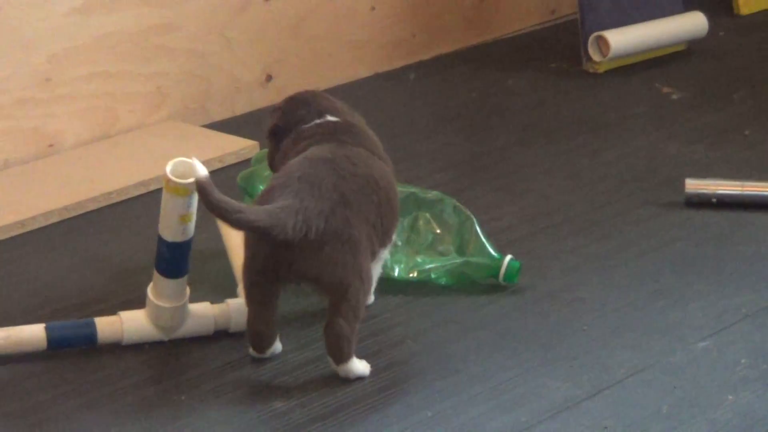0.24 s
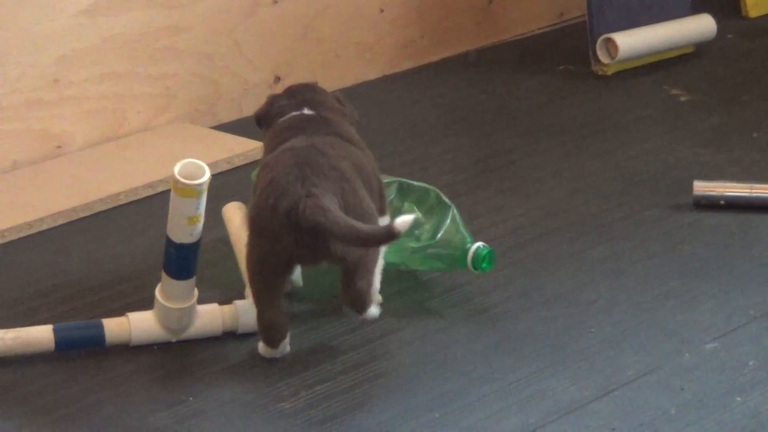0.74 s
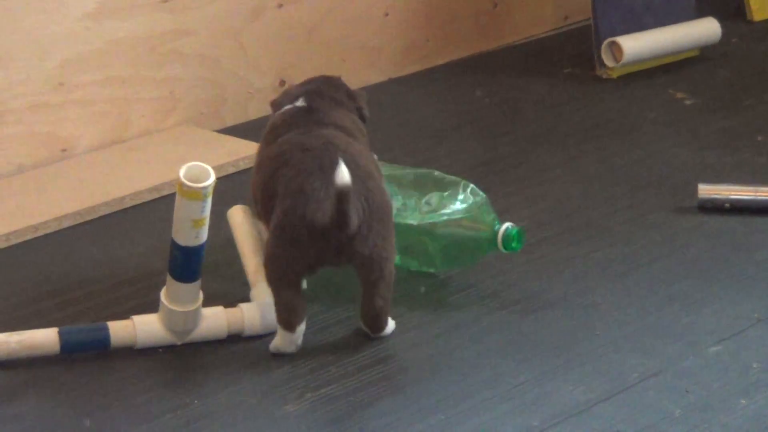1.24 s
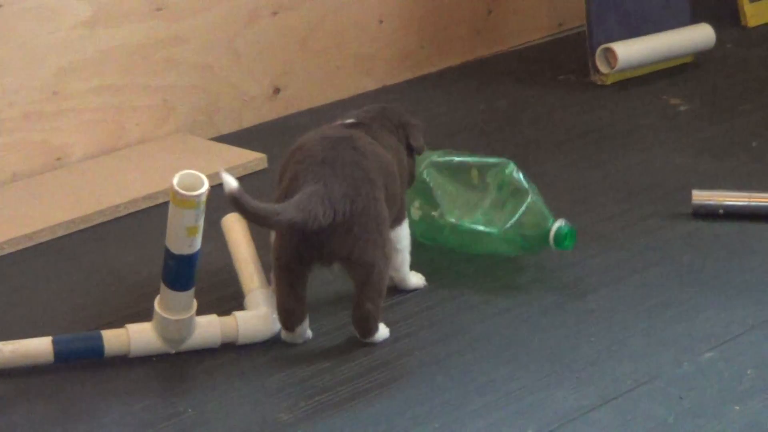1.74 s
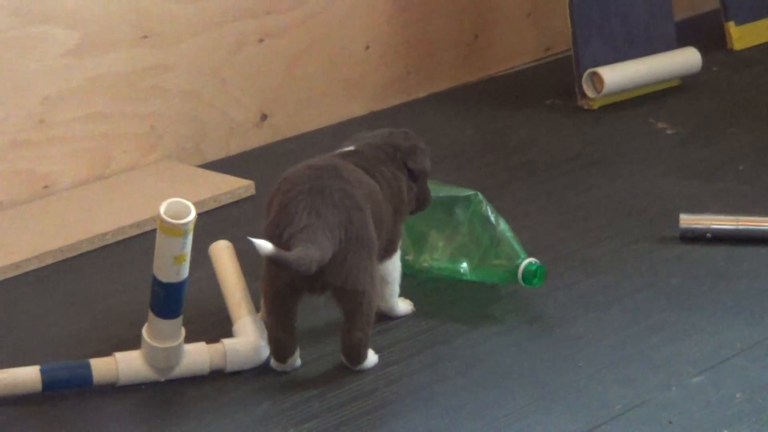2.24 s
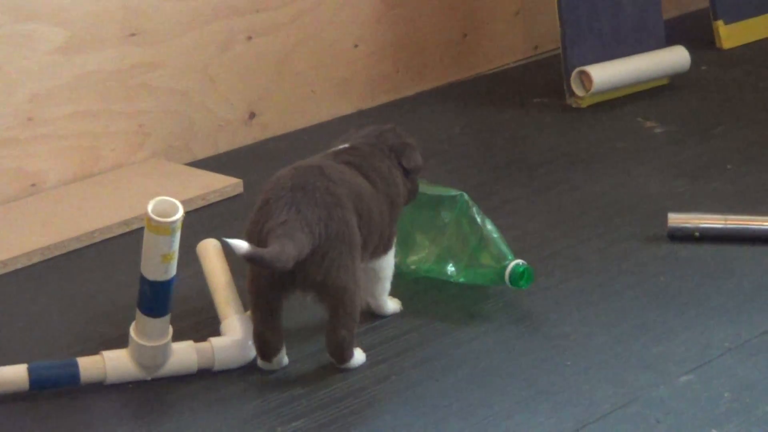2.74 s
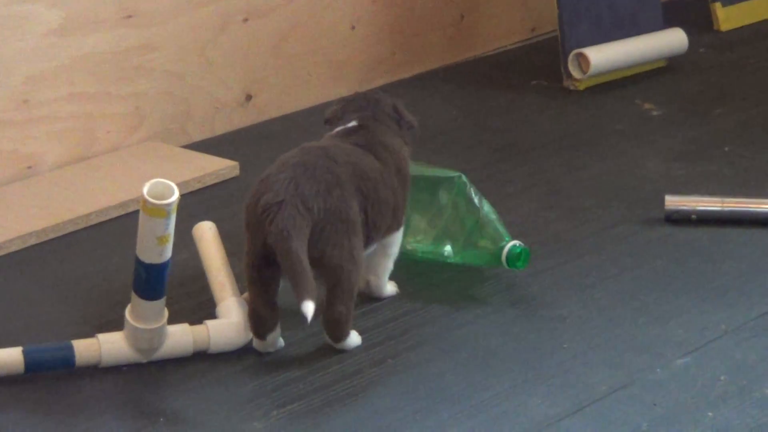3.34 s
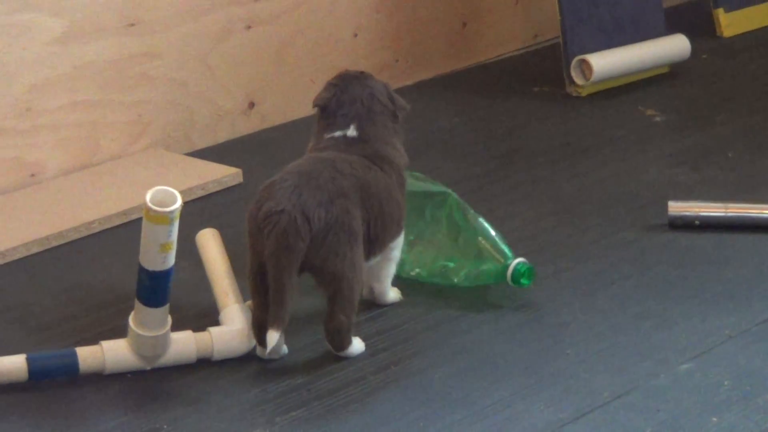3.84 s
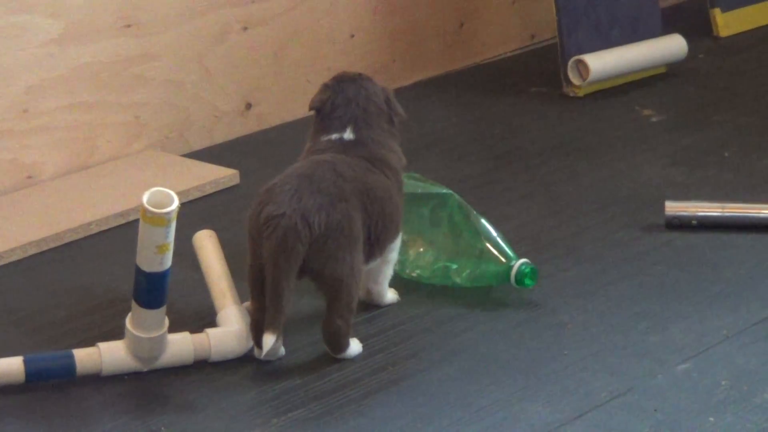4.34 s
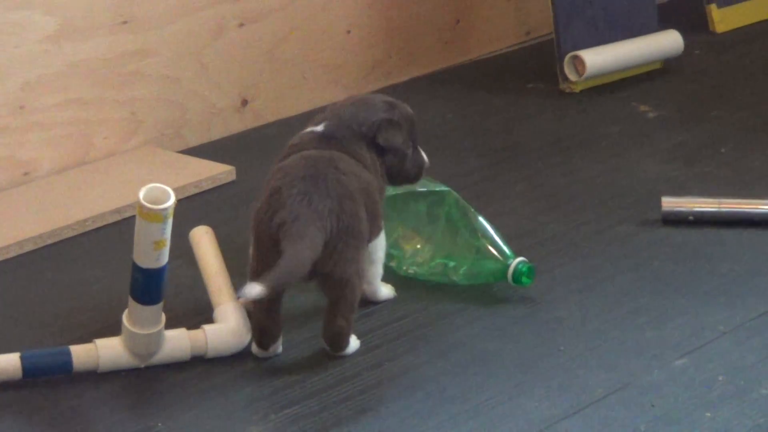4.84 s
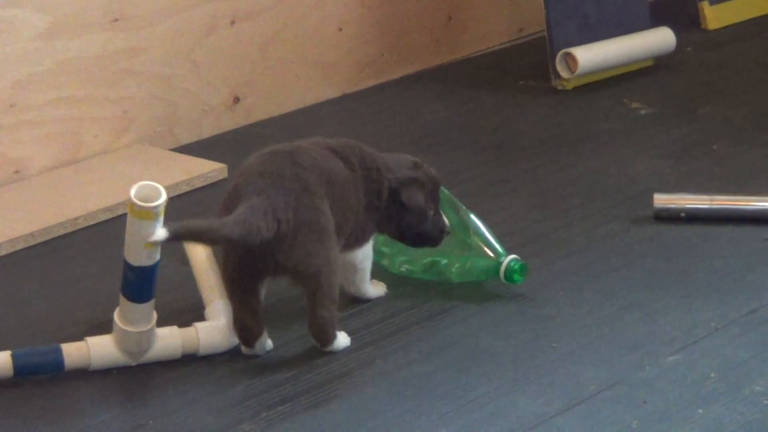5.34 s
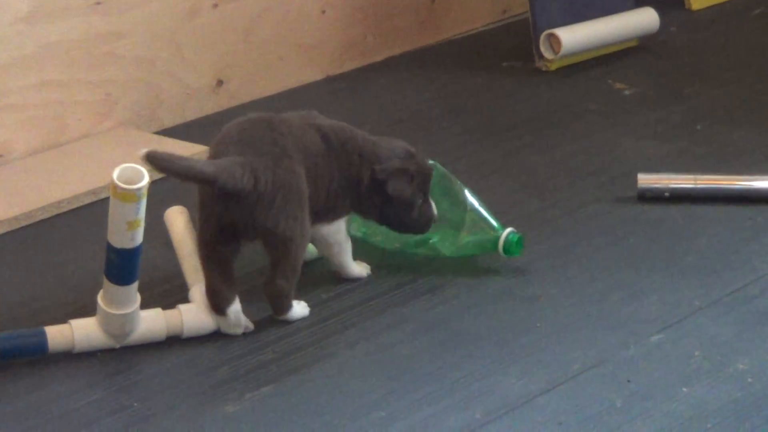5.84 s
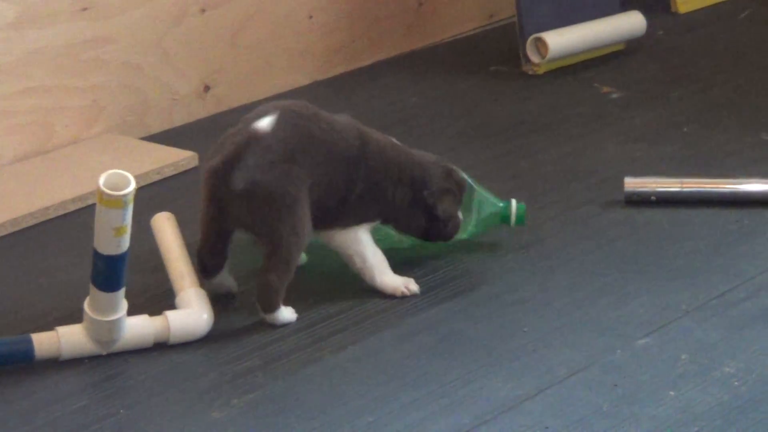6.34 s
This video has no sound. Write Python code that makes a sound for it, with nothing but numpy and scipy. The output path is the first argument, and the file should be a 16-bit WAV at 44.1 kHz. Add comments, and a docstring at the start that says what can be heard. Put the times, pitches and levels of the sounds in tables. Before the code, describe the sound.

Nearly continuous puppy whimpers and squeals, each a short cry rising then sagging, from near and farther animals. Underneath, padded feet scrape rubber, claws snap on plastic and an empty bottle gives low, dull thumps. Floor scuffing peaks after five seconds; the ending is sparser, with softer whines and a quick rasping creak. Low fan hum, soft room rush and a barely audible very high whistle. Two-channel pickup from one side, short room reflections.

```python
"""Puppies whine and squeal in a plywood pen: gliding partials, with noise for the hoarse breath.
Paws scuff the rubber floor (shaped noise) and knock a plastic bottle (ringing modes); claws tick on plastic.
Near the end comes a short run of creaks. A fan hums low in the room rush; a thin tone whistles at the top.
A two-port microphone takes the pen from one side, the left port leading in phase; the walls answer."""
import sys
import numpy as np
from scipy import signal
from scipy.fft import rfft, irfft, next_fast_len
from scipy.io import wavfile
from scipy.ndimage import uniform_filter1d, map_coordinates

SR = 44100
rng = np.random.default_rng(int(sys.argv[2]) if len(sys.argv) > 2 else 0)


def transcribe(u):
    """Save the signal u as a 16-bit wav file named by the first command-line argument.

    u: samples, shape (n,) or (channels, n), limited to [-1, 1]; the rate is SR.
    q: integer samples, one column per channel.
    """
    v = np.clip(np.atleast_2d(u).T, -1, 1)
    q = np.round(v * 32767).astype(np.int16)
    wavfile.write(sys.argv[1], SR, q)


N = 291501  # samples


def amp(db):
    """Decibels to amplitude."""
    return 10 ** (np.asarray(db) / 20)


def unit(x):
    """x scaled to an rms of one."""
    return x / np.sqrt(np.mean(x ** 2) + 1e-20)


def along(points, hz):
    """Read (freq_hz, value) points at hz, straight lines on a log frequency axis."""
    f, v = np.transpose(points)
    return np.interp(np.log(hz + 1), np.log(f + 1), v)


def wobble(rate, size=N):
    """A smooth random curve with rate knots a second."""
    knots = rng.standard_normal(int(size * rate / SR) + 4)
    return map_coordinates(knots, [np.arange(size) * rate / SR])


def filtered(x, response):
    """Multiply the spectrum of x by a response of frequency."""
    m = next_fast_len(x.shape[-1] + 8192)
    spectrum = rfft(x, m) * response(np.fft.rfftfreq(m, 1 / SR))
    return irfft(spectrum, m)[..., :x.shape[-1]]


def add(track, s, sound):
    """Mix a sound into the track from time s."""
    part = track[round(s * SR):][:len(sound)]
    part += sound[:len(part)]


# spectral shape of the room rush: freq_hz, level_db (relative)
RUSH_SHAPE = [(12, -55), (20, -24), (80, -1.5), (170, -0.5), (416, -11), (490, -7.5), (690, -16.5),
              (1010, -19), (1340, -19), (2150, -22.5), (3640, -27), (6000, -29), (8200, -23.5),
              (10500, -29.5), (13900, -36), (15500, -33)]
# likeness of the rush at the two ports: freq_hz, likeness (0-1)
RUSH_LIKENESS = [(60, 1), (180, 0.66), (550, 0.58), (1650, 0.075), (4970, 0.46), (15000, 1)]
# steady low lines of the fan: freq_hz, level_db (mean of the wavering peak level)
FAN_LINES = [(118.4, -44), (150.7, -42), (188.4, -47.5), (215.3, -49)]
RUSH_DB = -43.5  # mean level, rms
WHISTLE_HZ, WHISTLE_DB = 15734, -57.5  # mean level, rms


def air():
    """Room rush, partly alike at the two ports, with the fan's fuzzy low lines and the thin whistle."""
    def spread(f):
        turn = np.arccos(np.clip(along(RUSH_LIKENESS, f), 0, 1)) / 2
        return amp(along(RUSH_SHAPE, f)) * np.array([np.cos(turn), np.sin(turn)])

    mid, side = filtered(rng.standard_normal((2, N)), spread)
    rush = amp(RUSH_DB + 0.53 * wobble(3.04)) * unit(np.array([mid + side, mid - side]))
    t = np.arange(N) / SR
    fan = np.zeros(N)
    for hz, db in FAN_LINES:
        fan += amp(db + 2.5 * wobble(12)) * np.sin(2 * np.pi * hz * t + 1.5 * wobble(16))
    whistle_level = amp(WHISTLE_DB + 1.5 * wobble(40))
    whistle = whistle_level * np.sin(2 * np.pi * WHISTLE_HZ * t + .3 * wobble(20))
    return rush + fan + np.sqrt(2) * whistle


ONSET_DB, FADE_DB = 7, 8.5  # a whine starts and ends this far under its hold, before smoothing
GLIDE_BEND = .72  # share of a glide's pitch step done in the half away from the hold
ARCH, SAG_DB = .018, 3  # mid-hold the pitch arches up by this share, and the fundamental thins


def contour(row):
    """One whine's controls at its corners and halfway between: time, pitch and three levels."""
    start, glide_in, hold, glide_out, first, held, drifted, last, *levels = row
    first_db, late_db, octave_db, bright_db, late_bright_db = levels
    halves = np.abs([0, glide_in, glide_in, hold, hold, glide_out, glide_out]) / 2
    s = start + np.cumsum(halves)
    hz = [first, first + GLIDE_BEND * (held - first), held, (1 + ARCH) * (held + drifted) / 2,
          drifted, last + GLIDE_BEND * (drifted - last), last]

    def shape(a, b, sag_db):
        return [a - ONSET_DB, a, a, (a + b) / 2 - sag_db, b, b - FADE_DB / 2, b - FADE_DB]

    fundamental = shape(first_db, late_db, SAG_DB)
    octave = shape(octave_db, octave_db, 0)
    return s, hz, fundamental, octave, shape(bright_db, late_bright_db, 0)


# how the throat weights partials 3 to 12: freq_hz, level_db (relative)
THROAT = [(2500, -21.5), (3600, -18.5), (4500, 1), (5200, 1), (5900, -7.5), (7700, 1), (9200, -5.5),
          (10300, -22.5), (14000, -38)]
# spectral shape of the low hiss around the fundamental: freq_hz, level_db (relative)
HUSK_SHAPE = [(350, -30.5), (650, 0.5), (1100, -2), (1800, -4.5), (2300, -30.5)]
# spectral shape of the breath in the bright part: freq_hz, level_db (relative)
BREATH_SHAPE = [(300, -32), (800, -2.5), (1800, -0.5), (3000, -17.5), (4800, 1.5), (6000, -6), (7800, 9.5),
                (9800, -6), (12000, -47)]
MOUTH_HZ, MOUTH_WIDTH_HZ, MOUTH_DB = 1575, 297, 4  # the mouth lifts the low partials that cross it
HUSK_DB = -9  # against the fundamental's set level, at a hoarseness of 1


def call(corners, rough):
    """One whine: partials on a gliding pitch; hoarse folds waver, flutter and leak hiss."""
    s, *controls = corners
    t = np.arange(s[0], s[-1], 1 / SR)
    n = len(t)
    hz, first_db, octave_db, bright_db = [
        uniform_filter1d(np.interp(t, s, c), size=800, mode="nearest") for c in controls]
    waver = rough * (.04 * wobble(30, size=n) + .026 * wobble(150, size=n))
    hz = hz * (1 + .005 * wobble(14, size=n) + waver)
    phase = 2 * np.pi * np.cumsum(hz) / SR

    def flutter():
        return amp(2.3 * wobble(30, size=n)) * (1 + .7 * rough * wobble(200, size=n))

    def mouth(f):
        return MOUTH_DB / (1 + ((f - MOUTH_HZ) / MOUTH_WIDTH_HZ) ** 2)

    k = np.arange(3, 13)[:, None]  # overtone numbers
    upper = amp(along(THROAT, k * hz) + rng.normal(0, 1.5, k.shape))
    upper /= np.sqrt(np.sum(upper ** 2, axis=0))
    # each overtone's level drifts at random, apart from the others
    drift = amp([2.4 * wobble(18, size=n) for _ in k])
    tones = np.sin(k * phase + 2 * np.pi * rng.random(k.shape))
    overtones = np.sum(upper * drift * tones, axis=0)

    fundamental = amp(first_db + mouth(hz)) * flutter() * np.sin(phase)
    octave = amp(octave_db + mouth(2 * hz)) * flutter() * np.sin(2 * phase + 1)
    husk = unit(filtered(rng.standard_normal(n), lambda f: amp(along(HUSK_SHAPE, f))))
    low = fundamental + octave + rough * amp(first_db + HUSK_DB) * husk
    breath = unit(filtered(rng.standard_normal(n), lambda f: amp(along(BREATH_SHAPE, f))))
    bright = amp(bright_db) * (1.3 * flutter() * overtones + (.2 + .65 * rough) * breath)
    edge = np.clip(np.minimum(t - s[0], s[-1] - t) / .008, 0, 1)  # 8 ms ramps
    return edge * (np.sqrt(2) * low + bright)


# every whine glides in, holds while it drifts, and glides out; pitch and levels before waver and flutter:
# puppy, voice, start_s, glide_in_s, hold_s, glide_out_s, first_hz, held_hz, drifted_hz, last_hz,
# fundamental_db at hold start, fundamental_db at hold end, octave_db,
# bright_db at hold start, bright_db at hold end
WHINES = [ ("far", "hoarse", .088, .004, .006, .02, 805, 793, 815, 980, -41, -43, -67, -60, -60),
          ("near", "husky", .155, .07, .08, .075, 930, 1075, 1170, 1270, -38, -31.5, -52.5, -40.5, -52),
          ("far", "husky", .51, .01, 0.021, 0.021, 314, 320, 328, 326, -40, -42, -38, -60, -70),
          ("near", "clear", .709, .012, .026, 0.016, 1680, 1614, 1340, 1090, -25, -24.5, -62, -44, -36.5),
          ("near", "clear", .983, .014, 0.16, .04, 1680, 1560, 1460, 1044, -27, -19.5, -53.5, -36.5, -29.5),
          ("far", "hoarse", 1.15, 0.019, .005, 0.014, 823, 850, 854, 1000, -34, -36, -44, -55, -60),
          ("near", "clear", 1.345, .064, .27, .036, 893, 1175, 1085, 1070, -30, -33.5, -40, -26.5, -33),
          ("far", "rough", 1.36, 0.053, 0.035, .016, 1068, 1310, 1290, 1320, -35, -35, -58, -60, -60),
          ("second", "rough", 1.62, .056, .05, 0.025, 670, 973, 960, 740, -32, -25.5, -48, -53, -38),
          ("near", "husky", 1.72, .075, .075, 0.048, 1245, 1760, 1760, 1000, -27.5, -27.5, -55, -40, -41),
          ("near", "rough", 1.92, .056, .074, 0.05, 556, 906, 818, 722, -24.5, -32.5, -49, -48.5, -43.5),
          ("far", "rough", 1.985, .03, .01, 0.029, 1600, 1660, 1640, 1000, -40.5, -42, -69, -60, -60),
          ("near", "husky", 2.1, .064, .064, .04, 975, 1262, 1066, 770, -40, -36, -45.5, -34, -30.5),
          ("far", "hoarse", 2.11, 0.027, .04, .012, 1410, 1437, 1530, 1560, -46, -43, -66, -57, -60),
          ("second", "hoarse", 2.15, 0.0346, 0.104, 0.017, 620, 810, 790, 710, -24, -24.5, -38.5, -64, -62),
          ("near", "husky", 2.25, .015, 0.031, .015, 800, 775, 780, 700, -27, -29, -30.5, -30, -31),
          ("near", "husky", 2.3, .04, 0.0594, 0.023, 850, 950, 1005, 1020, -29.5, -35, -46, -33, -38),
          ("second", "hoarse", 2.31, 0.019, 0.044, 0.041, 722, 685, 705, 670, -30, -38.5, -51, -72, -68),
          ("second", "hoarse", 2.5, .044, .03, 0.0406, 900, 949, 930, 910, -45, -37, -44, -46, -43),
          ("second", "hoarse", 2.6, 0.0303, .07, 0.051, 700, 830, 720, 586, -30, -32.5, -44.5, -54, -70),
          ("near", "clear", 2.6, .02, .13, 0.032, 1300, 1195, 1110, 980, -34.5, -43, -50, -39, -31.5),
          ("far", "hoarse", 2.3, .016, .04, .014, 2000, 1593, 1700, 1354, -44, -45, -72, -55, -60),
          ("near", "clear", 2.945, .035, .095, .075, 1163, 1285, 1225, 808, -38, -40, -55, -41.5, -36),
          ("second", "hoarse", 2.95, .04, .16, 0.057, 700, 800, 680, 640, -36.5, -30.5, -51, -73, -70),
          ("near", "clear", 3.16, .1, .34, .08, 980, 1270, 1255, 880, -31, -24, -54.5, -32.5, -30),
          ("second", "hoarse", 3.39, .014, 0.0445, .052, 660, 685, 678, 578, -23.5, -32.5, -36, -55, -58),
          ("far", "rough", 3.48, .034, .136, 0.025, 1157, 990, 756, 1100, -42, -40, -46, -44, -50),
          ("second", "hoarse", 3.66, 0.051, .03, 0.0687, 620, 890, 800, 700, -28.5, -26.5, -46, -45, -47),
          ("near", "rough", 3.87, .05, .29, .07, 760, 850, 840, 760, -37.5, -29, -34.5, -37, -34.5),
          ("second", "hoarse", 3.945, .05, .02, .055, 950, 1170, 1090, 860, -30.5, -29, -51, -32.5, -41),
          ("second", "clear", 4.25, .04, .025, .025, 1080, 1370, 1350, 1290, -19, -17, -44, -36, -31),
          ("near", "rough", 4.26, 0.029, 0.0905, .06, 780, 760, 757, 751, -37, -32, -35, -30, -37),
          ("second", "rough", 4.32, .02, .05, .05, 1320, 1250, 990, 800, -32.5, -33, -29, -28, -32),
          ("near", "rough", 4.44, .036, 0.055, 0.034, 755, 781, 885, 960, -31.5, -33, -47, -58, -46),
          ("near", "rough", 4.555, .065, .115, .06, 900, 1170, 1000, 637, -27, -28, -25.5, -24.5, -27.5),
          ("second", "husky", 4.61, 0.017, .054, 0.019, 1272, 1199, 1235, 1227, -21.5, -35, -40.5, -31, -27),
          ("near", "rough", 4.94, .06, .11, .03, 700, 975, 925, 690, -31, -32.5, -42, -43.5, -35),
          ("near", "rough", 5.3, .052, .07, .078, 556, 975, 900, 620, -30, -31, -41, -36, -35.5),
          ("near", "husky", 5.63, .06, .11, .025, 1260, 1210, 1080, 720, -37, -43.5, -51, -46.5, -49.5),
          ("second", "hoarse", 5.64, 0.0098, .06, .06, 665, 680, 650, 552, -29.5, -38, -53, -60, -50),
          ("far", "husky", 5.915, 0.023, .006, 0.021, 256, 321, 320, 293, -38.5, -46, -39, -65, -68),
          ("near", "rough", 6.03, .17, .13, .06, 1110, 920, 925, 670, -44, -39, -42.5, -49, -45),
          ("far", "clear", 6.05, .03, .008, .022, 1523, 1607, 1605, 1640, -40, -44, -71, -58, -54),
          ("far", "husky", 6.32, .06, 0.0384, .03, 308, 392, 323, 208, -37, -43, -40, -55, -70),
          ("near", "husky", 6.562, 0.016, 0.028, 0.0055, 1046, 1022, 1055, 1100, -44, -39, -53.5, -57, -50),
          ]
# hoarseness of each kind of voice: voice, hoarseness (0-1)
HOARSENESS = {"clear": .12, "husky": .3, "rough": .45, "hoarse": .62}


def puppy(name):
    """All the whines of one puppy, each with the hoarseness of its voice."""
    out = np.zeros(N)
    for who, voice, *row in WHINES:
        if who == name:
            add(out, row[0], call(contour(row), HOARSENESS[voice]))
    return out


# paw scuffs on the floor: start_s, level_db, length_s (of the rounded fall), dullness_db per octave
SCUFFS = [(.156, -34, 0.045, -7.5), (0.279, -34, .05, -6), (.436, -29.5, 0.073, -3),
          (.63, -36.5, 0.062, -5), (0.9, -36, 0.046, -6.5), (1.3137, -27, 0.11, -1),
          (1.472, -26.5, 0.056, -9), (1.511, -26.5, 0.14, -1.5), (1.73, -24.5, .14, -2),
          (1.914, -38.5, 0.045, -10), (2.049, -27, 0.16, 1), (2.406, -47, 0.23, -10.5),
          (2.484, -33, 0.082, 1.5), (2.678, -24, 0.018, 4.5), (2.932, -33, 0.057, 5),
          (3.128, -19, 0.029, -.5), (3.3414, -19, 0.084, 1.5), (3.661, -25.5, 0.066, 3.5),
          (3.7975, -35, 0.094, -3), (4.083, -21.5, .044, -1), (4.276, -27, 0.014, 2.5),
          (4.436, -24.5, 0.044, -3), (4.752, -28, 0.061, -3), (4.8994, -24.5, 0.068, -3),
          (5.0694, -16, 0.083, -4), (5.171, -18.5, 0.15, -3.5), (5.225, -11.5, 0.074, -4),
          (5.371, -28.5, 0.046, -9.5), (5.4245, -15, 0.078, -4), (5.61, -22.5, 0.081, 2),
          (5.818, -32.5, .071, -5), (5.873, -42.5, .04, -7), (5.932, -44, .15, -6.5)]
# spectral shape of a pad on rubber: freq_hz, level_db (relative)
RUBBER = [(120, -49), (200, -25.5), (540, 1), (735, 5), (1040, -2.5), (1400, 2), (2020, -6), (8100, -14.5),
          (10500, -19.5), (13000, -35.5), (16000, -42)]
SCUFF_RISE_S = 0.0064  # time constant


def scuffs():
    """A pad slides on rubber: clumped grains of friction, a rise, a rounded end."""
    out, t = np.zeros(N), np.arange(SR // 4) / SR
    for s, db, length, dull_db in SCUFFS:
        clumps = amp(3 * wobble(400, size=len(t)) + 1.5 * wobble(60, size=len(t)))
        grain = unit(rng.standard_normal(len(t)) * clumps)

        def rubber(f):
            return amp(along(RUBBER, f) - dull_db * np.log2((f + 50) / 2000))

        swell = (1 - np.exp(-t / SCUFF_RISE_S)) * np.exp(-(t / max(length, .005)) ** 2)
        add(out, s, amp(db) * swell * filtered(grain, rubber))
    return out


# claws on plastic: start_s, level_db (of the burst, before its spectrum)
TICKS = [(.436, -30.5), (1.478, -16), (1.5167, -19), (1.544, -26), (1.733, -19), (1.9094, -23),
         (2.9447, -32.5), (3.336, -19), (5.375, -24), (5.4223, -22), (5.616, -20.5), (5.8166, -32)]


def ticks():
    """A claw snaps on stiff plastic: a broad crack whose noise dies within milliseconds."""
    plastic = [(300, 1.5), (1200, -8.5), (10000, -4.5), (15000, -23)]  # freq_hz, level_db
    out, t = np.zeros(N), np.arange(SR // 20) / SR
    for s, db in TICKS:
        crack = filtered(rng.standard_normal(len(t)), lambda f: amp(along(plastic, f)))
        add(out, s, amp(db - 60 * t / 0.057) * crack)  # 57 ms to fall 60 dB
    return out


def struck(events, modes, attack):
    """Every blow rings the modes at new strengths, with wobbling phases that keep them from ringing pure."""
    out, t = np.zeros(N), np.arange(SR // 3) / SR
    for s, db in events:
        ring = np.zeros(len(t))
        for hz, level, t60 in modes:
            decay = amp(level + rng.normal(0, 2) - 60 * t / t60)
            ring += decay * np.sin(2 * np.pi * hz * t + 1.1 * wobble(50, size=len(t)))
        add(out, s, amp(db) * (1 - np.exp(-t / attack)) * ring)
    return out


# paws on the bottle: start_s, level_db (added to each mode's level)
KNOCKS = [(0.665, -42.5), (1.481, -29.5), (1.509, -39), (1.537, -26.5), (1.74, -18), (1.807, -24.5),
          (1.863, -28), (3.334, -35), (4.926, -37.5), (5.228, -46), (5.615, -46)]
# modes of the bottle: freq_hz, level_db (mean over blows), t60_s
BOTTLE_MODES = [(224, -5, .22), (299, -11, .12), (447, 2, .18), (560, -8, .1), (640, -8, .1),
                (820, -10, .06)]


def bottle():
    """Paws knock the plastic bottle, whose dented wall rings in a few low modes."""
    return struck(KNOCKS, BOTTLE_MODES, attack=.004)


# modes of a creak: freq_hz, level_db (mean over slips), t60_s
CREAK_MODES = [(646, -2, 0.024), (1530, 7, 0.021), (1730, 3.5, 0.021)]
CREAK_START_S, CREAK_END_S, CREAK_PER_S, CREAK_DB = 6.12, 6.3, 41, -32  # mean rate and level


def creaks():
    """An uneven run of short rasps: each slip rings the creak modes."""
    s = np.arange(CREAK_START_S, CREAK_END_S, 1 / CREAK_PER_S)
    chance = rng.standard_normal((40, 2))[:len(s)]
    slips = zip(s + .2 * chance[:, 0] / CREAK_PER_S, CREAK_DB + 3 * chance[:, 1])
    return struck(slips, CREAK_MODES, attack=0.0022)


# decay of the pen's echoes: freq_hz, t60_s
PEN_DECAY = [(300, 0.26), (1500, 0.2), (5000, 0.29), (12000, 0.17)]


def pen(x):
    """The plywood walls answer with a noise tail; each frequency dies at its own speed."""
    hz, t, z = signal.stft(rng.standard_normal((2, SR // 2)), SR, nperseg=256)
    decay = amp(-60 * t / along(PEN_DECAY, hz)[:, None])
    tail = signal.istft(z * decay, SR, nperseg=256)[1]
    tail = tail / np.linalg.norm(tail[0])
    # soft bedding swallows the treble
    soft = filtered(x, lambda f: 1 / np.sqrt(1 + (f / 6000) ** 2))
    late = np.pad(soft, (300, 0))[None]  # the echoes start 300 samples late
    return signal.fftconvolve(late, tail, axes=1)[:, :N]


# phase step between the ports: freq_hz, left_lead_rad
PORT_LEAD = [(60, 0), (200, 0.32), (600, 0.88), (1300, 1.19), (2500, 1.03), (4500, 0.79), (8000, 0.71),
             (12000, 0.23)]
# level step between the ports: freq_hz, left_minus_right_db
PORT_TILT = [(100, -7), (300, 4), (600, -3), (5000, -3), (9000, -2.5), (13000, 0.5)]


def ports(x):
    """The two ports hear a source from one side with a phase and level step."""
    side = np.array([[.5], [-.5]])
    return filtered(x, lambda f: amp(side * along(PORT_TILT, f)) * np.exp(1j * side * along(PORT_LEAD, f)))


# how much of each source is sent to the walls: source, send_db
ECHO_DB = {"near": -9, "second": -2.5, "far": -4, "floor": -7}


def scene():
    """Puppies and floor sounds at the ports, with their echoes and the air of the room."""
    room = air()
    sources = {name: puppy(name) for name in ("near", "second", "far")}
    sources["floor"] = scuffs() + ticks() + bottle() + creaks()
    sent = sum(amp(ECHO_DB[name]) * x for name, x in sources.items())
    same_side, other_walls = pen(sent)
    # most echoes come back from the same side as the voices, a part from the other walls
    direct = ports(sum(sources.values()) + same_side)
    return direct + amp(-6.5) * other_walls * np.array([[1], [-1]]) + room


TOP_HZ = 15850  # band limit


def record(dry):
    """The preamplifier rounds the loudest peaks; nothing stays above the band limit."""
    rounded = dry / (1 + np.abs(dry / .7) ** 4) ** (1 / 4)
    return filtered(rounded, lambda f: f < TOP_HZ)


dry = scene()
out = record(dry)
transcribe(out)
```